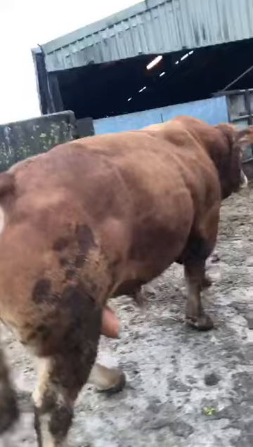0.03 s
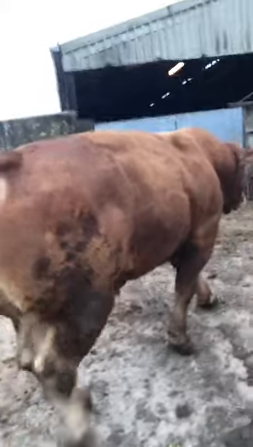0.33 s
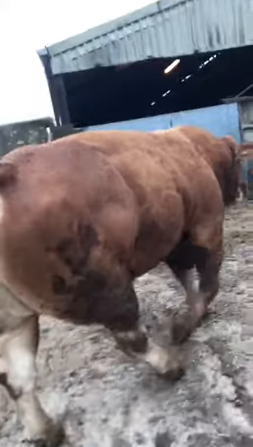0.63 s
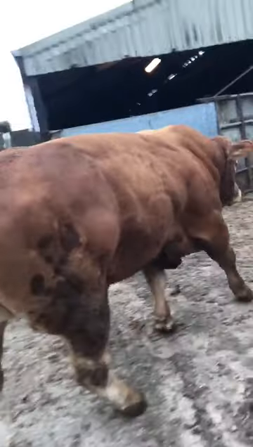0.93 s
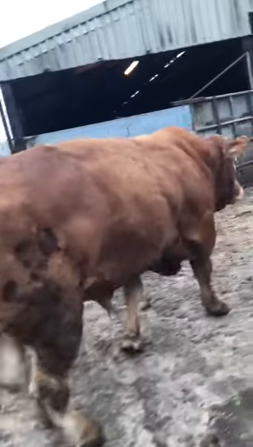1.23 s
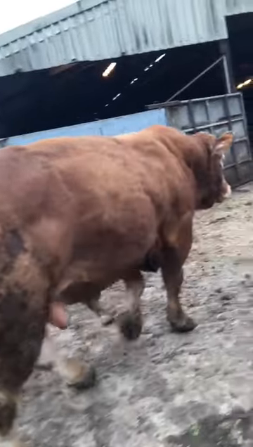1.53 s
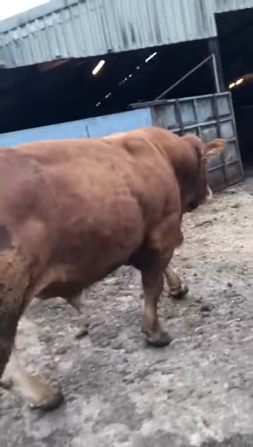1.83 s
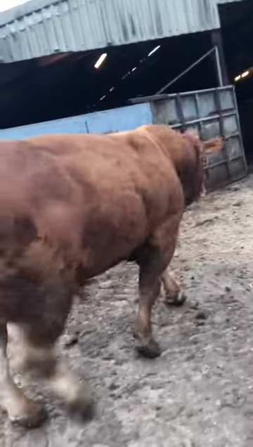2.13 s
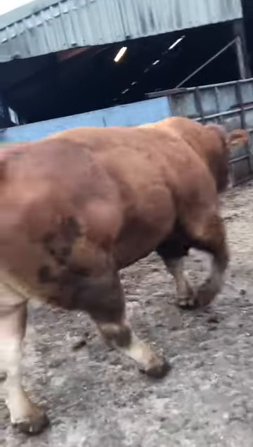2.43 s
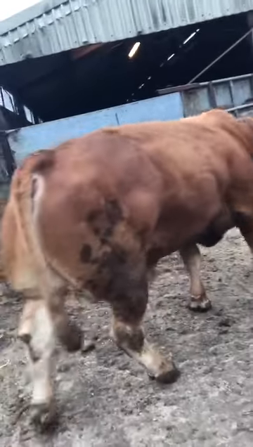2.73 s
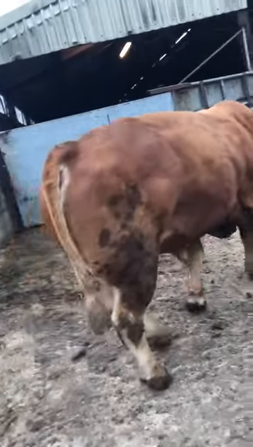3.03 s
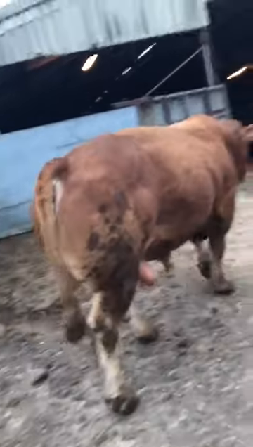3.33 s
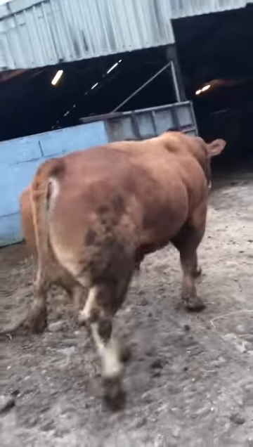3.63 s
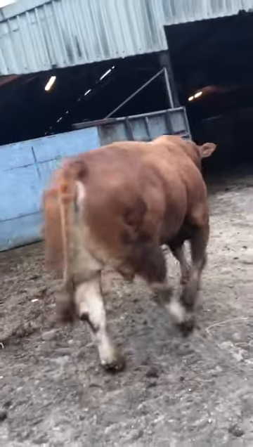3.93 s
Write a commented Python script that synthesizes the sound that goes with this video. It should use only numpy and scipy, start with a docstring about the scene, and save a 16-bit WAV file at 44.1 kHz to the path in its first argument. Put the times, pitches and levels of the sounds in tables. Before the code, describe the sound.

A bull bellows five times, about once a second, each call rising from a hoarse growl into a clear high note with rushing breath. His hooves faintly thud and scuff grit on concrete, and the farmyard sheds echo.

```python
"""A concrete farmyard, where a walking bull bellows about once a second.
Each bellow climbs as a hoarse growl from his unevenly flapping vocal folds, breaks into a clear
high note over rushing air, and drops back into the growl. The sheds ring on after each call.
Hooves thud and scuff grit faintly over a quiet, distant rumble."""
import sys
import numpy as np
from scipy import signal
from scipy.fft import rfft, irfft, next_fast_len
from scipy.io import wavfile
from scipy.ndimage import map_coordinates

SR = 44100
rng = np.random.default_rng(int(sys.argv[2]) if len(sys.argv) > 2 else 0)


def unload_wav(signal):
    """Save mono or channel-first audio to the path in sys.argv[1] as 16-bit WAV at rate SR, clipped to [-1, 1]."""
    wavfile.write(
        sys.argv[1],
        SR,
        np.round(np.clip(np.atleast_2d(signal).T, -1, 1) * 32767).astype(np.int16),
    )


N = 176400
T = np.arange(N) / SR

# the bellows (start [s], break into the clear note [s], release [s], growl gain [dB], air gain [dB],
# hiss gain [dB], growl pitch under the note [Hz])
BELLOWS = [(-.35, -.09, 0.19, 4.5, -1.5, 0, 329.5), (0.671, .94, 1.243, -0.5, -2.5, -1, 407.3),
           (1.659, 1.905, 2.254, -.5, -3.5, -1, 409.6), (2.668, 2.922, 3.245, 0.5, -5, -2.5, 406.7),
           (3.689, 3.96, 4.17, 1, -2, 1, 408)]


def clear_note():
    """The vocal folds lock into a nearly pure high note that turns brassier and duller as it goes."""
    # loudness, one list per note (time [s], level [dB])
    notes = [
        [(0.0, -15.5), (0.024, -10.5), (0.144, -30), (0.178, -15), (0.218, -33), (0.236, -23.5), (0.25, -23.5)],
        [(0.945, -38), (0.969, -18.5), (0.997, -15.5), (1.067, -23.5), (1.139, -17), (1.169, -31), (1.195, -11),
         (1.213, -10.5), (1.249, -24.5), (1.281, -16.5), (1.295, -32)],
        [(1.905, -36), (1.925, -17.5), (1.951, -13.5), (1.995, -10.5), (2.037, -20), (2.069, -17),
         (2.095, -29.5), (2.125, -16), (2.195, -22), (2.211, -12.5), (2.29, -20), (2.33, -22.5)],
        [(2.915, -31), (2.93, -16), (3.065, -12), (3.103, -13.5), (3.197, -11), (3.221, -13.5), (3.245, -27)],
        [(3.95, -25), (3.972, -17), (4.0, -10.5)],
    ]
    # pitch and brassiness, one list per note (time [s], pitch [Hz], overtone gain [dB])
    tones = [
        [(0, 467.5, 7.5), (.05, 464.8, -8), (.13, 474.3, -11.5), (.18, 448.2, -15.5), (.25, 462, -24)],
        [(.95, 444, -14), (1.01, 461.3, -1), (1.09, 464.8, -2.5), (1.14, 464.6, -5.5), (1.2, 456, -8.5),
         (1.29, 446.6, -15)],
        [(1.91, 447.5, -11), (1.96, 452.4, -6), (2.01, 455.6, 2), (2.09, 466.4, -0.5), (2.15, 471.7, -5),
         (2.21, 458.8, -5), (2.3, 461, -10)],
        [(2.92, 444, -8.5), (3, 449.8, -1), (3.06, 452.8, -2), (3.11, 452.3, 1), (3.17, 452.6, 0),
         (3.23, 455.2, 0.5)],
        [(3.95, 438, -20), (4, 448.3, -4)],
    ]
    # higher tones that make it brassy (multiple of the pitch, level [dB])
    overtones = [(2, -31.5), (3, -45), (4, -47.5), (5, -53)]
    edge_s = 0.0023
    flutter, shimmer_db = 1 + 0.0028 * drift(55), -0.07 * drift(40)
    overtone_gains = [from_db(db + 2.2 * drift(32)) for _, db in overtones]
    roughness = .07 * drift(89)
    pure, brass = 0, 0
    for note, tone in zip(notes, tones):
        times, db = np.transpose(note)
        tone_times, hz, brass_db = np.transpose(tone)
        phase = 2 * np.pi * np.cumsum(np.interp(T, tone_times, hz) * flutter) / SR
        outside_s = np.maximum(np.maximum(times[0] - T, T - times[-1]), 0)
        gate = np.exp(-np.minimum(outside_s / edge_s, 20))
        pure += gate * from_db(np.interp(T, times, db) + shimmer_db) * np.sin(phase)
        upper = sum(gain * np.sin(k * (phase + roughness)) for k, gain in enumerate(overtone_gains, 2))
        brass += gate * from_db(np.interp(T, tone_times, brass_db)) * upper
    return np.sqrt(2) * (yard(pure, wet_db=-14) + yard(brass, wet_db=-8.5))


def hoarse_voice():
    """Rough pulses in the throat, with rasp, rushing air and hiss chopped by the same pulses."""
    # how throat and mouth shape the growl (frequency [Hz], gain [dB])
    throat = [(80, -20.5), (130, -7.5), (175, 2.5), (205, -4.5), (250, 2.5), (305, -0.5), (375, 0),
              (450, 12.5), (500, 0.5), (610, 3), (735, 5), (830, 3.5), (950, -5.5), (1200, 3.5),
              (1500, -27.5), (2050, 1), (2900, -42)]
    # low rasp of the throat (frequency [Hz], level [dB])
    throat_rasp = [(60, -42.5), (120, -20.5), (155, -9), (176, -2), (205, 8.5), (255, 2), (315, -3.5),
                   (375, 16), (415, 1), (452, 27.5), (510, -1), (800, -44.5)]
    # air rushing through the mouth (frequency [Hz], level [dB])
    mouth_rush = [(300, -37.5), (520, -3.5), (620, -4.5), (715, 3.5), (770, 0), (890, 5.5), (1000, -4.5),
                  (1220, -4.5), (1400, -3), (1580, -9), (1880, -8), (2130, -14), (2330, -16.5), (2600, -19),
                  (2900, -32.5), (4000, -58)]
    # hiss at the lips (frequency [Hz], level [dB])
    lip_hiss = [(1500, -24), (3000, -1), (3900, 4), (5500, 3), (6800, 5), (7800, -1), (8900, 1),
                (10500, -2.5), (12000, -16)]
    growl_db, air_db, hiss_db = np.transpose(BELLOWS)[3:6]
    phase = growl_phase()
    pulses = sum(from_db(-9 * np.log2(k)) * np.cos(k * phase) for k in range(1, 15))  # -9 dB an octave
    shimmer_db = 6.5 * np.tanh(drift(110))
    crack_db = 3.5 * np.tanh(drift(28))  # the growl catches and breaks up
    growl = colour(pulses * from_db(shimmer_db + crack_db), throat)
    chop = (1 + 0.14 * np.cos(phase)) * from_db(1.2 * drift(22))
    rasp, rush, hiss = (colour(chop * rng.standard_normal(N), spectrum)
                        for spectrum in (throat_rasp, mouth_rush, lip_hiss))
    growl *= effort(growl_db, start_db=-39, break_db=-25.5, hold_db=-41, push_db=-29,
                    attack_s=0.036, push_s=0.15, fall_db_per_s=179, lag_s=0.014)
    rasp *= effort(growl_db, start_db=-32.5, break_db=-41, hold_db=-40.5, push_db=-30,
                   attack_s=0.17, push_s=0.24, fall_db_per_s=146.5)
    rush *= effort(air_db, start_db=-49, break_db=-37.5, hold_db=-36.5, push_db=-30,
                   attack_s=0.047, push_s=0.28, fall_db_per_s=249)
    hiss *= effort(hiss_db, start_db=-70, break_db=-61.5, hold_db=-54, push_db=-53.5,
                   attack_s=.03, push_s=0.3, fall_db_per_s=191, lag_s=0.012)
    whistle = whistling() * effort(hiss_db, start_db=-69.5, break_db=-63, hold_db=-61, push_db=-64.5,
                                   attack_s=0.04, push_s=0.087, fall_db_per_s=148)
    body = yard(growl + rasp + ground(rush) + squeaks(), wet_db=-3.5)
    return body + yard(ground(hiss + whistle), wet_db=2.5)


def growl_phase():
    """The vocal folds flap unevenly; their rate climbs, holds and drops with each bellow."""
    # the growl on its way up (share of the climb [0 to 1], pitch [Hz])
    climb = [(0, 95), (.16, 120), (.3, 162.5), (0.429, 178), (.52, 227), (.64, 285.1), (.78, 352.1),
             (1, 399.6)]
    share, climb_hz = np.transpose(climb)
    climb_jitter, growl_jitter = 0.0371, .066  # the folds beat more evenly while the pitch climbs
    drop_lead_s, drop_s = .035, .2  # the pitch starts to sink just before the release
    hz, jitter = np.zeros(N), np.zeros(N)
    for start, clear, release, *_, held_hz in BELLOWS:
        rising = np.interp((T - start) / (clear - start), share, climb_hz)
        falling = held_hz * np.exp(-np.maximum(T - release + drop_lead_s, 0) / drop_s)
        hz = np.where(T < start, hz, np.where(T < clear, rising, falling))
        jitter = np.where(T < start, jitter, np.where(T < clear, climb_jitter, growl_jitter))
    wobble = 1 + jitter * (drift(94.4) + .5 * drift(20.02))
    return 2 * np.pi * np.cumsum(hz * wobble) / SR


def effort(gains_db, start_db, break_db, hold_db, push_db, attack_s, push_s, fall_db_per_s, lag_s=0):
    """Loudness through every bellow: the lead-up to the break, a hold, a last push and a fade."""
    out = 0
    for (start, clear, release, *_), gain_db in zip(BELLOWS, gains_db):
        end = release + lag_s
        times = [start, clear - .025, clear + 0.094, end - push_s, end]
        db = np.interp(T, times, [start_db, break_db, hold_db, hold_db, push_db])
        fade_db = fall_db_per_s * np.maximum(T - end, 0)
        out += from_db(gain_db + db - fade_db) * np.clip((T - start) / attack_s, 0, 1)
    return out


def squeaks():
    """Brief unsteady tones as the voice breaks into or out of the clear note."""
    # the squeaks (time [s], pitch [Hz], level [dB], length [s], pitch slide [Hz/s])
    voice_breaks = [(.888, 765, -30, 0.11, 599), (0.913, 1175, -34, 0.12, 499),
                    (1.17, 910, -25.5, 0.051, 6), (1.863, 765, -27, 0.041, 1299.5),
                    (2.188, 725.6, -28, 0.061, -200), (2.894, 746, -20.5, 0.023, 899),
                    (3.231, 725.3, -30.5, .061, -200), (3.886, 694, -36, 0.024, 9),
                    (3.922, 729.8, -21.5, 0.031, 892)]
    edge_s = 0.0064
    out, wobble = 0, 1 + 0.01395 * drift(83.4)
    for start, hz, db, length_s, slide in voice_breaks:
        gate = np.clip((T - start) / edge_s, 0, 1) * np.clip((start + length_s - T) / edge_s, 0, 1)
        pitch = (hz + slide * np.clip(T - start, 0, length_s)) * wobble
        out += from_db(db) * gate * np.sin(2 * np.pi * np.cumsum(pitch) / SR)
    return out


def whistling():
    """Breath rings at a few thin, high pitches that wander as the mouth moves."""
    # the whistles (pitch [Hz], width [Hz], gain [dB])
    whistles = [(3520, 94, -3), (3950, 45, 3), (4410, 290, -2), (4906, 160, -1.5), (6050, 69, -3),
                (6360, 30, -3), (6680, 40, -8.5), (8900, 54, -3.5)]
    air = rng.standard_normal(N + SR)
    rings = sum(from_db(db) * signal.lfilter(*signal.iirpeak(hz, hz / width, fs=SR), air)
                for hz, width, db in whistles)
    speed = 1 + .008 * drift(3)  # reading faster or slower bends the pitch
    return rms_one(map_coordinates(rings, [np.cumsum(speed)]))


def hooves():
    """Soft thuds of the bull's weight, and crunches and sharp snaps of grit on concrete."""
    # hoof scuffs (time [s], level [dB], decay [s], added brightness [dB/octave])
    scuffs = [(.243, -45.5, 0.01, 6), (.292, -50, 0.0018, 8), (0.373, -47, 0.0096, -1),
              (.512, -57, .016, 3), (0.616, -49, 0.0021, 8), (0.629, -50.5, 0.026, 0.5),
              (.84, -37.5, 0.002, 4), (.931, -45, 0.0022, 6), (1.319, -44.5, 0.027, -6),
              (1.508, -49.5, .021, 2.5), (1.601, -49.5, 0.0098, 3), (1.979, -35, 0.0031, -3.5),
              (2.288, -43, 0.006, 0), (2.51, -42, 0.0055, 1), (2.63, -52, 0.016, 19),
              (2.711, -38.5, 0.0027, -8), (3.047, -43, 0.0033, 9.5), (3.173, -39.5, 0.0085, -4),
              (3.191, -33, 0.0015, -3.5), (3.377, -47, 0.0038, 14)]
    # tone of crunching grit (frequency [Hz], level [dB])
    grit = [(400, -4), (1500, 1), (2600, -1), (4500, 5.5), (7000, 0.5), (11000, -6.5)]
    # hoof thuds (time [s], level [dB])
    thuds = [(0.127, -46), (1.599, -41), (2.506, -43), (2.872, -51)]
    # deep tone of a thud (frequency [Hz], level [dB])
    thud_tone = [(25, -24), (55, -4.5), (90, 13), (200, 0.5), (500, -83)]
    grains = rng.standard_normal(N) * from_db(8.2 * np.tanh(drift(400)))
    crunch = 0
    for start, db, decay_s, tilt in scuffs:
        spectrum = [(hz, level + tilt * np.log2(hz)) for hz, level in grit]
        crunch += colour(grains, spectrum) * contact(start, db, 0.39 * decay_s, decay_s)
    weight = sum(contact(start, db, rise_s=0.0052, decay_s=0.012) for start, db in thuds)
    return crunch + noise(thud_tone) * weight


def contact(start, level_db, rise_s, decay_s):
    """Loudness of one hoof contact: it rises quickly and dies away."""
    age = np.maximum(T - start, 0)
    return from_db(level_db) * np.minimum(age / rise_s, 1) * np.exp(-np.minimum(age / decay_s, 20))


def ground(x):
    """Add the sound's bounce off the concrete; its delay sways as the head moves."""
    delay_s = .0042 * (1 + 0.062 * drift(0.87))
    return x + from_db(-12.5) * np.interp(T - delay_s, T, x)


def yard(x, wet_db):
    """Add the ring of walls and sheds, as strong as wet_db says; the treble dies first."""
    # how long the yard rings (frequency [Hz], time to fade by 60 dB [s])
    ring_times = [(150, 1.23), (450, 1.56), (900, 0.97), (2000, 0.64), (4000, 0.073), (10000, 0.083)]
    t = np.arange(SR + SR // 2) / SR
    edges_hz, delay_s = np.geomspace(60, 13000, 10), 0.011
    tail = 0
    for low, high in zip(edges_hz, edges_hz[1:]):
        band_filter = signal.butter(2, [low, high], "band", fs=SR, output="sos")
        band = signal.sosfilt(band_filter, rng.standard_normal(len(t)))
        tail += band * from_db(-60 * t / at_hz(ring_times, np.sqrt(low * high)))
    tail = tail * (t > delay_s) / np.sqrt(SR / 14)
    return x + from_db(wet_db) * signal.fftconvolve(x, tail)[:N]


def background():
    """A faint, steady rumble from far away."""
    # tone of the rumble (frequency [Hz], level [dB])
    rumble = [(25, -27.5), (60, -4), (150, -7), (400, -12), (1000, -11.5), (2500, -25), (9000, -33),
              (12000, -37)]
    return from_db(-57.5) * noise(rumble)


def from_db(db):
    """Turn decibels into a multiplier."""
    return 10 ** (np.asarray(db) / 20)


def rms_one(x):
    """Scale a signal to an average power of one."""
    return x / np.sqrt(np.mean(x ** 2) + 1e-20)


def at_hz(points, hz):
    """Read between the rows of a frequency table, with octaves evenly spaced."""
    frequencies, values = np.transpose(points)
    return np.interp(np.log(np.maximum(hz, 1)), np.log(frequencies), values)


def colour(x, spectrum):
    """Turn a sound's frequencies up or down by a table, then scale it to a power of one."""
    size = next_fast_len(N + 8192)
    gains = from_db(at_hz(spectrum, np.fft.rfftfreq(size, 1 / SR)))
    return rms_one(irfft(rfft(x, size) * gains, size)[:N])


def noise(spectrum):
    """Noise with the tone that a table gives it."""
    return colour(rng.standard_normal(N), spectrum)


def drift(rate_hz):
    """A smooth random wobble of about size one; a higher rate wobbles faster."""
    pole = np.exp(-2 * np.pi * rate_hz / SR)
    return rms_one(signal.lfilter([1], [1, -2 * pole, pole * pole], rng.standard_normal(N + SR))[SR:])


def scene():
    """The bull's voice and hooves over the background, in one channel."""
    return (hoarse_voice() + clear_note() + hooves() + background())[None]


def record(dry):
    """Cut off the highest treble steeply."""
    cutoff_hz = 11900
    return signal.sosfilt(signal.ellip(10, .1, 80, cutoff_hz, fs=SR, output="sos"), dry)


dry = scene()
out = record(dry)
unload_wav(out)
```